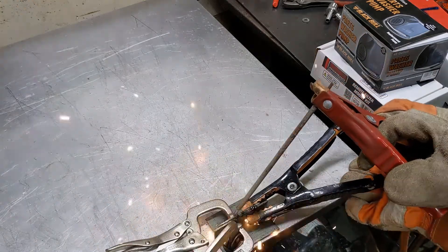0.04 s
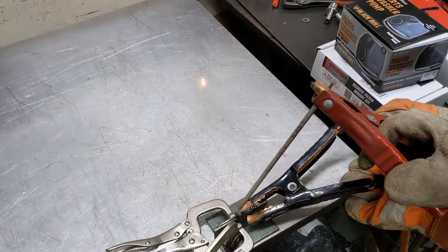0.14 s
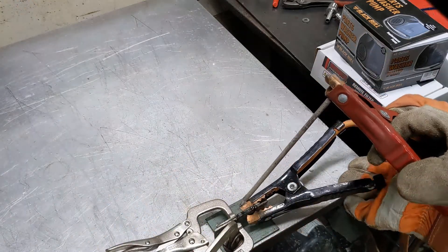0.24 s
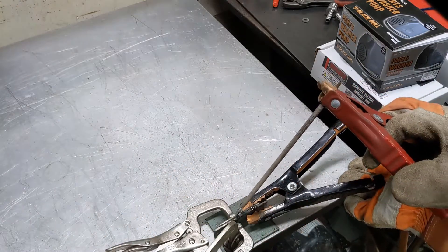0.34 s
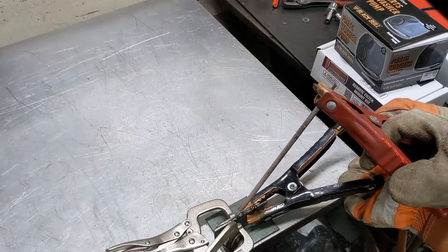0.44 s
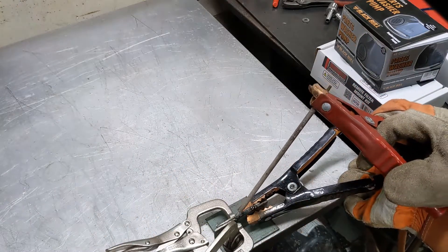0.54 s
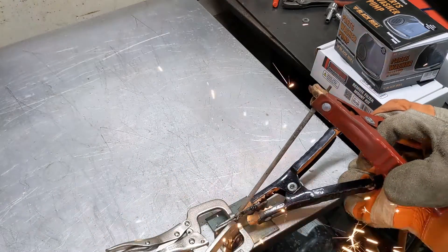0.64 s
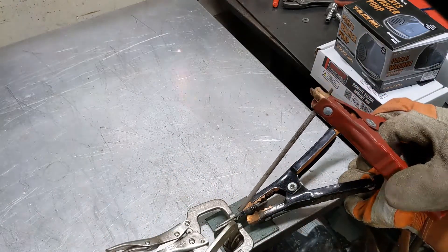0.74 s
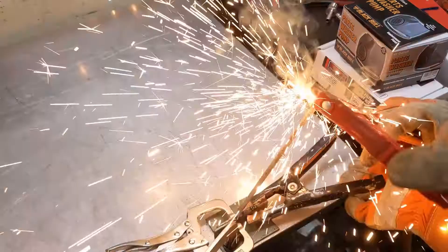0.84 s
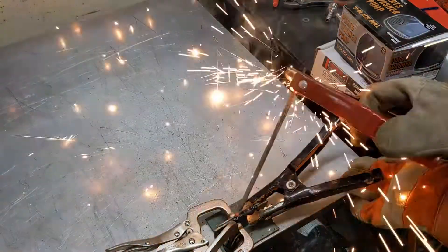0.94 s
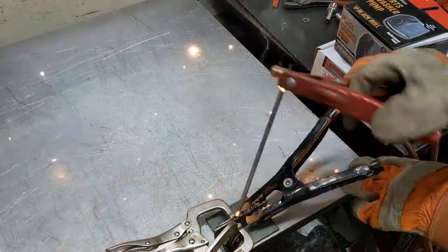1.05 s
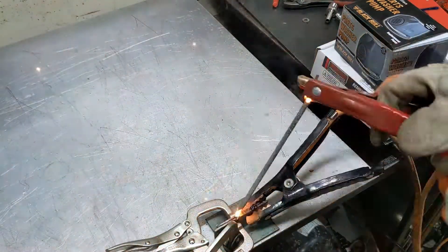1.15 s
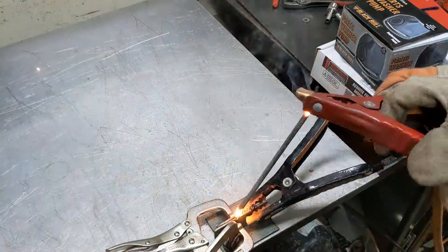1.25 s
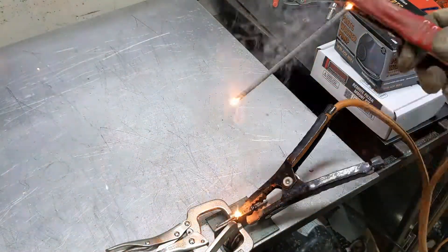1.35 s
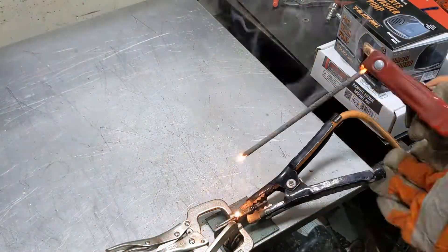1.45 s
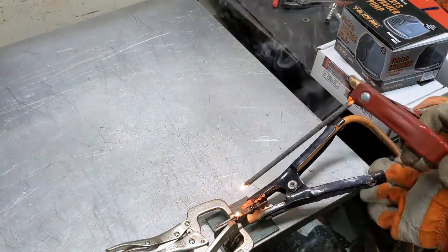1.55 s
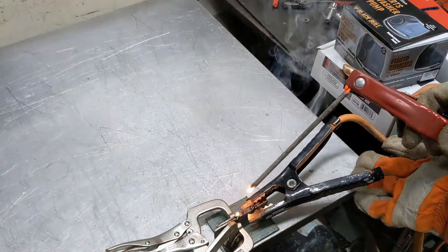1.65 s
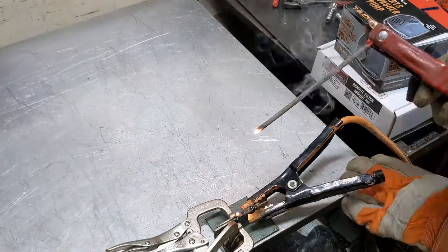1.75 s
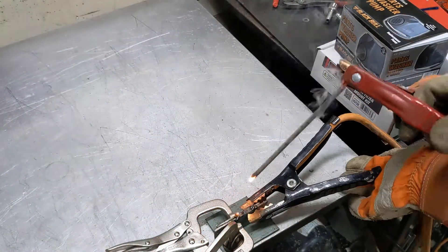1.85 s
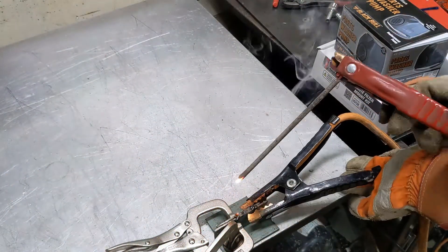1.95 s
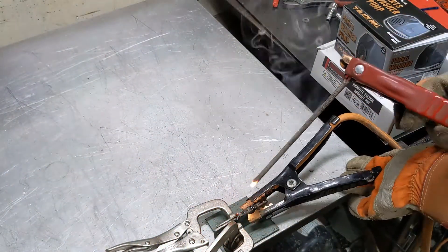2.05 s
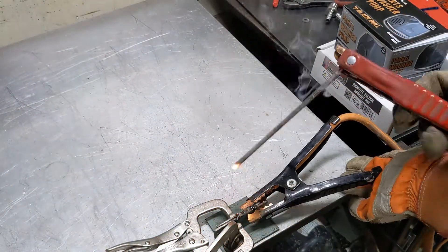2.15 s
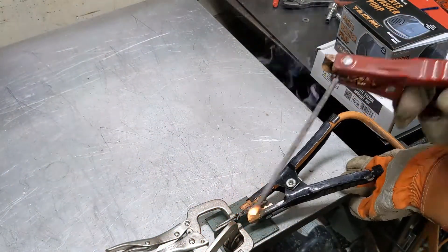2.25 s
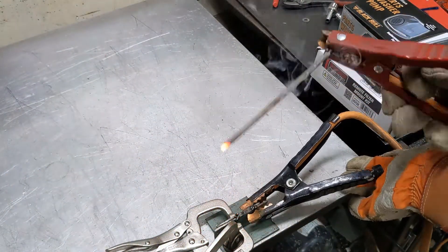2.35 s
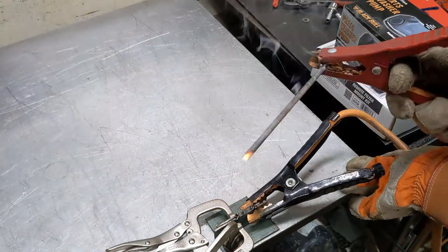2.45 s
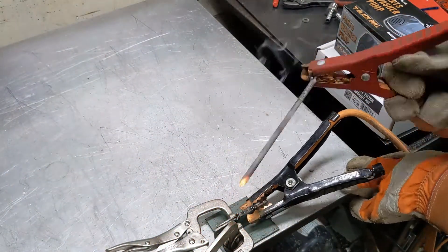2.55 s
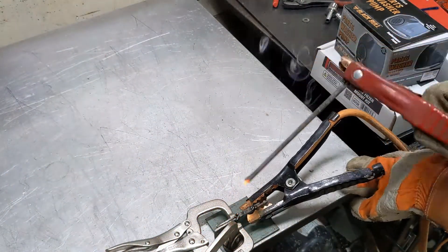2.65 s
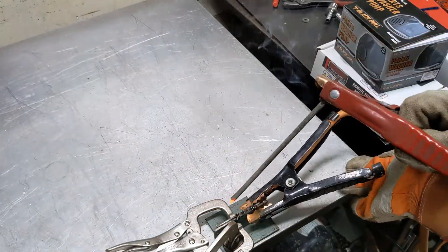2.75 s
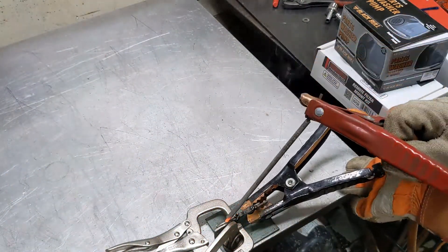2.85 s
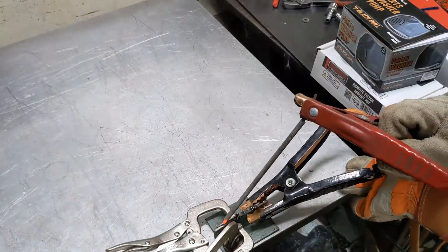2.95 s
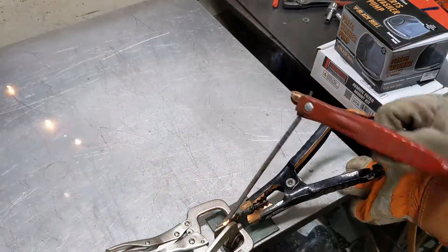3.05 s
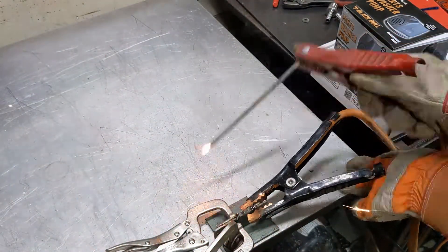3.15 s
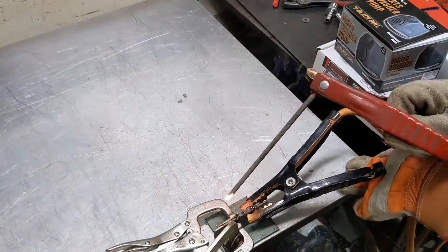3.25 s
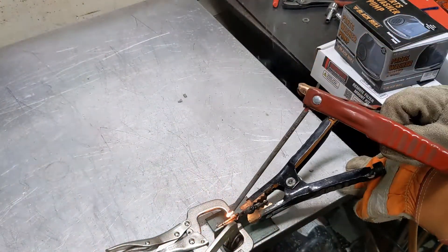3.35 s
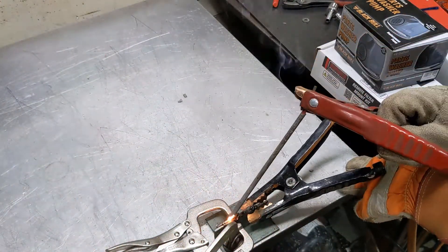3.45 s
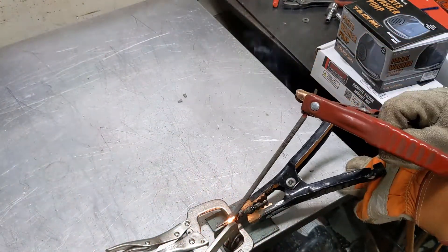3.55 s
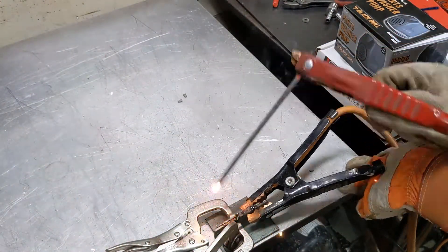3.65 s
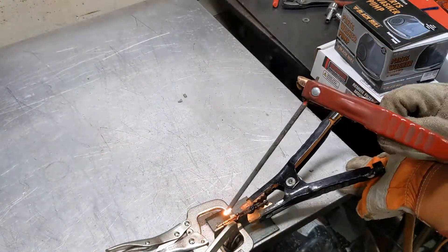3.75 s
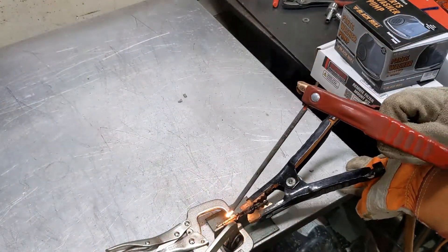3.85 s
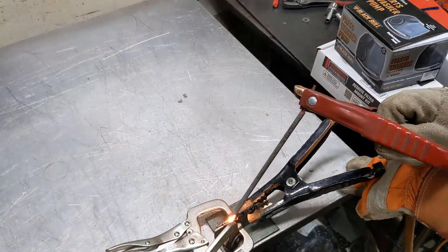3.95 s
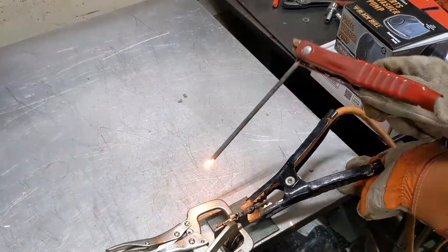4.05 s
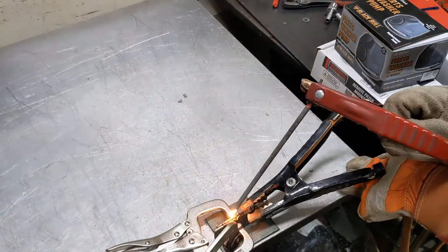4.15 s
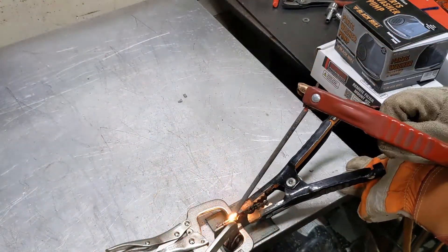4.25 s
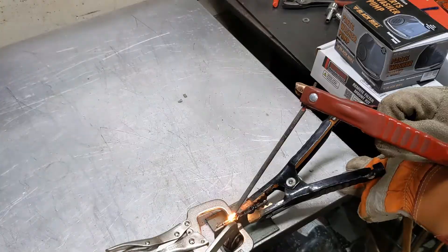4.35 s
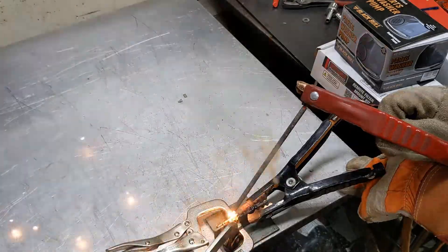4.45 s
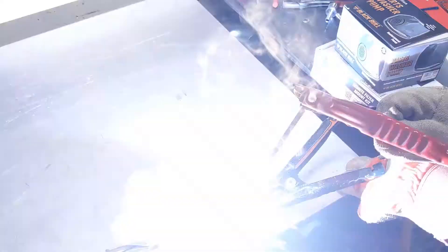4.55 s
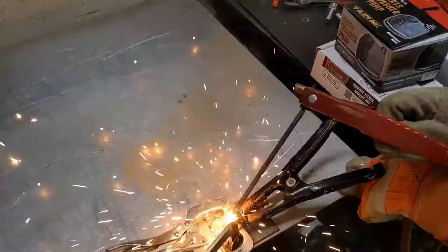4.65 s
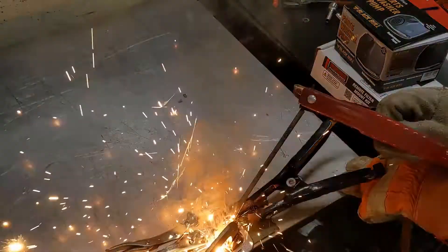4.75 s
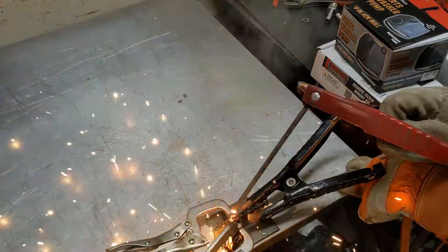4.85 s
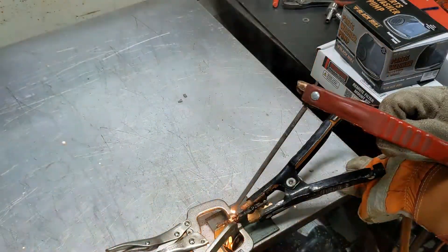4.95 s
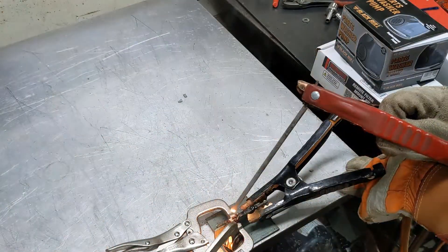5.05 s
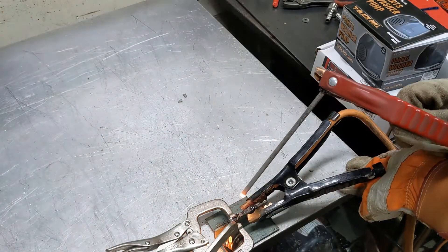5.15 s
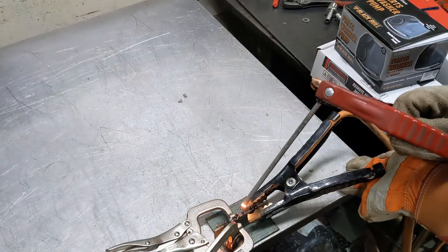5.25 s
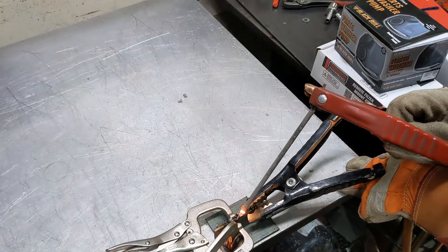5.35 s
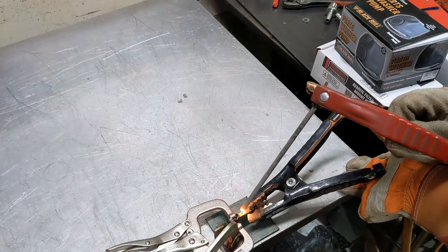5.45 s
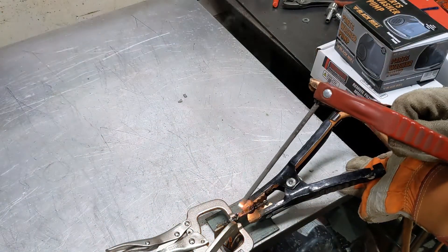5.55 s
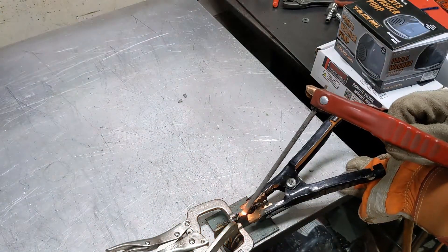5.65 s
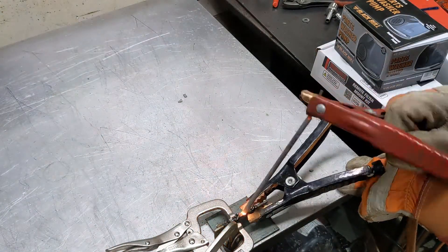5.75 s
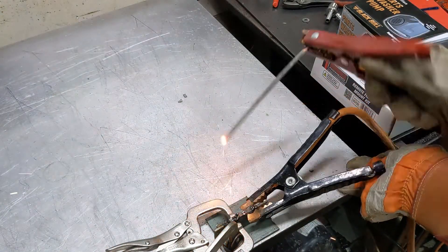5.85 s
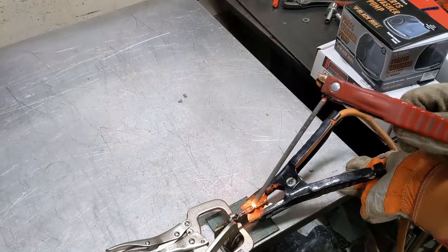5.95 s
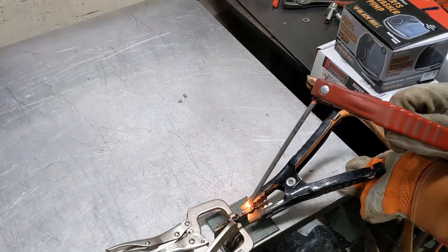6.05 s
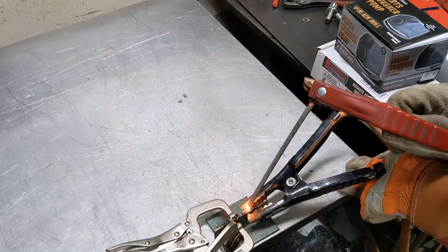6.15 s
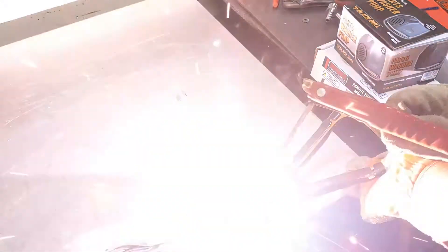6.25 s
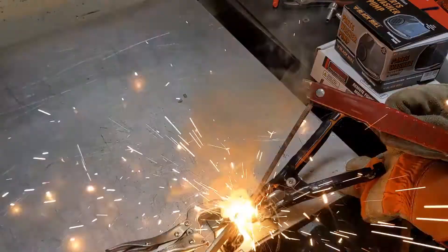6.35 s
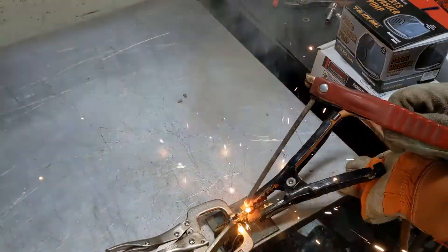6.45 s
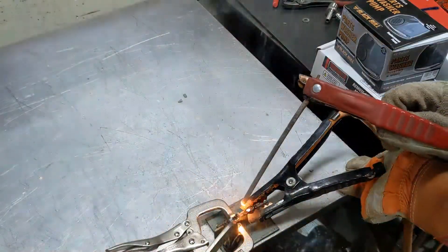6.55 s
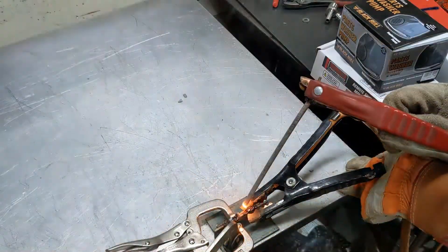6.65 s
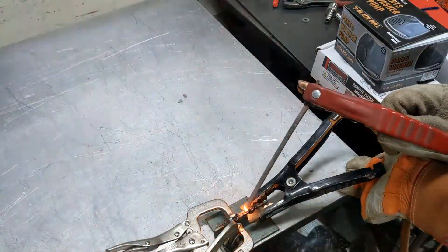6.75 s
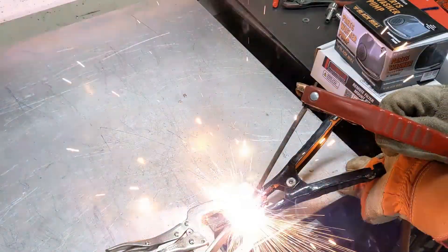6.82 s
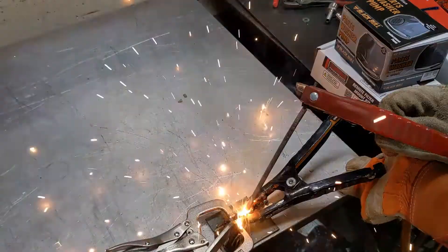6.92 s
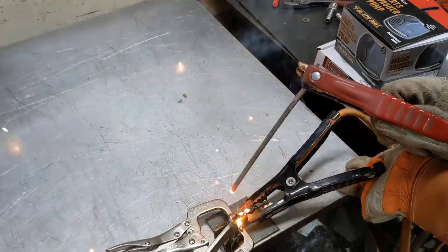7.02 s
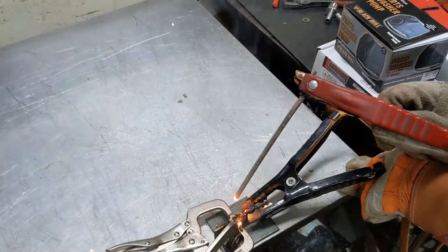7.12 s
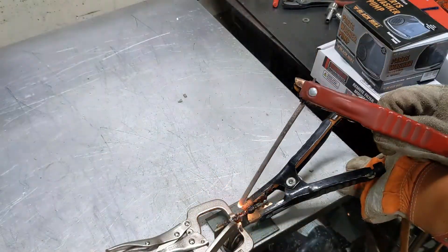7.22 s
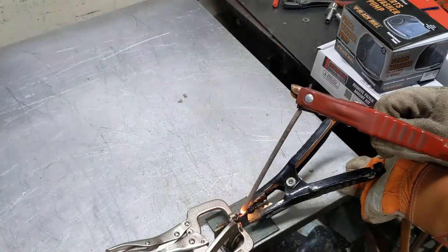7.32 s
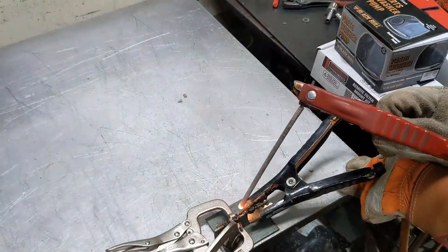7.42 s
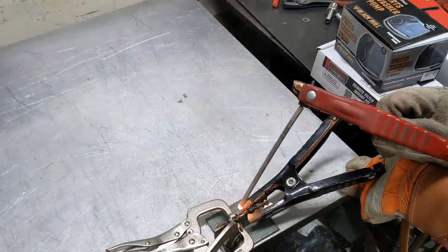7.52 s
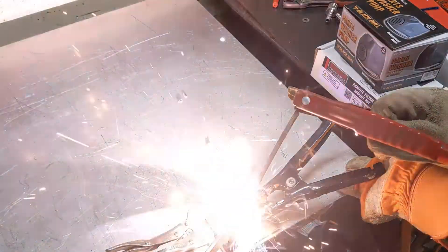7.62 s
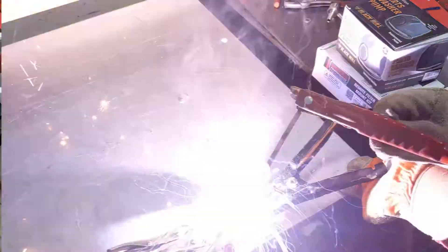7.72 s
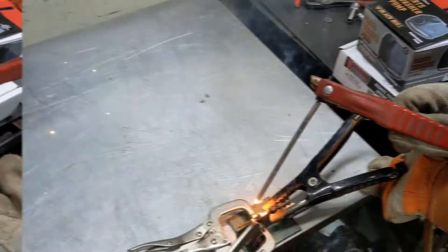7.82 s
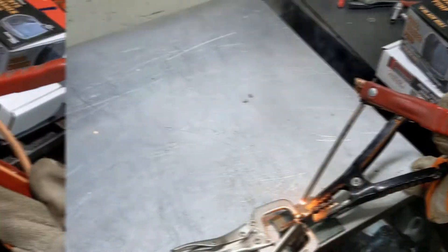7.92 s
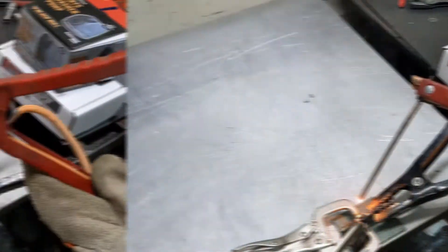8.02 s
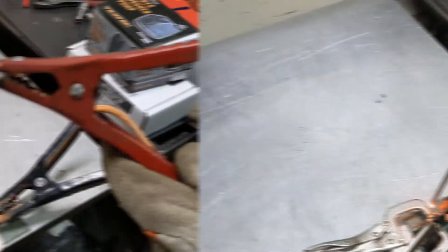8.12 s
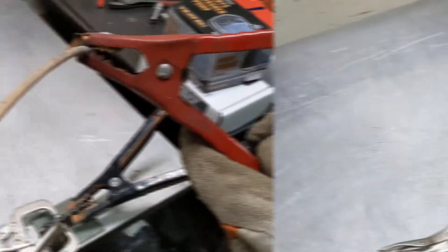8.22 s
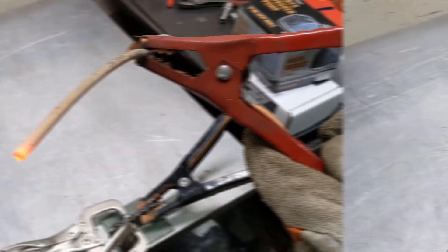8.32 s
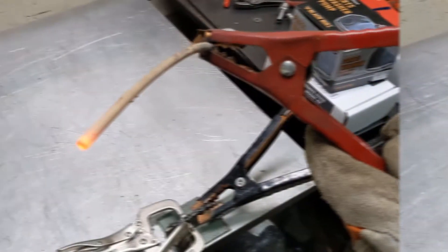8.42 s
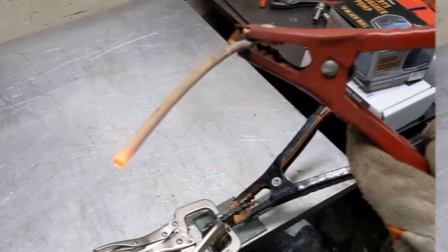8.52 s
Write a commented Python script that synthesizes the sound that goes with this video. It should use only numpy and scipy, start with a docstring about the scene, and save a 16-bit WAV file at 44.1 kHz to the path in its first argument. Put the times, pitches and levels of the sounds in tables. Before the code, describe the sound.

A stick-welding arc keeps catching and dying on clamped steel, heard close in a workshop over a faint steady fan and transformer hum. A quick cluster of pops opens. Snaps near 0.6 seconds lead to a loud sizzling, cracking sputter from 0.8 to 1 second, ending in a light metallic ring. Another snap comes at 1.3, then only faint ticks and hisses. Between 3 and 4 seconds, rod taps make small separate snaps, some ringing slightly. The arc sputters with sharp pops from 4.4 to 4.8, followed by two thin snaps near 5.6 and 5.9. Loud short bursts of crackle, sizzle and thumping pops come at about 6.3, 6.9 and 7.6 to 7.8 seconds, leaving spatter fizzing faintly as it cools. At about 8.2 seconds the hum and fizz give way abruptly to a quiet low rumble.

```python
"""Sharp pops and short sputters of a stick-welding arc that never holds, over a fan's hum.
The rod is scratched and tapped on clamped steel in a workshop: both ring, a light touch only flashes.
When the arc catches, discharges sizzle, hot gas roars, sparks crack, molten bridges burst, and
spatter is left fizzing on the plate. Near the end the welder's fan, its transformer hum and the fizz
give way abruptly to a low rumble."""
import sys
import numpy as np
from scipy import signal
from scipy.fft import rfft, irfft, next_fast_len
from scipy.io import wavfile
from scipy.ndimage import uniform_filter1d

SR = 44100
rng = np.random.default_rng(int(sys.argv[2]) if len(sys.argv) > 2 else 0)


def file_out(sig):
    """Save sig as 16-bit WAV at sys.argv[1]."""
    # one column per channel
    cols = np.atleast_2d(sig).T
    # limit, then scale
    lim = np.clip(cols, -1, 1)
    pcm = np.round(lim * 32767).astype(np.int16)
    wavfile.write(sys.argv[1], SR, pcm)


N = 378378
TIME = np.arange(N) / SR
BURN_SAG_DB_PER_S = 44

# arc catches: start_s, length_s, sizzle_db, roar_re_sizzle_db, left_right_db, spatter_db
BURNS = [(0.025, 0.013, -39.5, -15, 3, -56), (0.8244, 0.056, -21, -12, 1.5, -56),
         (4.4041, 0.014, -23, -10.5, -1.5, -79), (4.5741, 0.061, -28.5, -8.5, 0.5, -52),
         (4.712, 0.037, -32.5, -11, -0.5, -55.5), (4.756, 0.016, -27.5, -6, -1, -53),
         (6.276, 0.028, -37.5, -24, 8, -70), (6.3027, 0.032, -20.5, -9.5, 3, -61),
         (6.35, 0.039, -25.5, -13, -1, -53), (6.824, 0.081, -34.5, -19, 4, -71),
         (6.901, 0.042, -31, -10.5, 0.5, -56.5), (7.586, 0.082, -25.5, -12, 0.5, -75),
         (7.66, 0.077, -39, -27, 4, -58)]
# touches that only flash: start_s, sizzle_db, brightness_db, left_right_db
FLASHES = [(0.032, -20.5, 6, 6), (0.577, -35, 2, 2), (0.6671, -22.5, 5, 1), (0.9291, -24, 2, -2),
           (0.956, -32.5, 4, 9), (0.9801, -24, 6, 12), (1.2963, -22.5, 3, 3), (3.0187, -25.5, 4.5, -1.5),
           (3.176, -29.5, 3, -2.5), (3.2307, -34.5, 6, -4.5), (3.558, -31.5, -28, -1),
           (3.6442, -28.5, 6.5, -0.5), (3.9792, -33, 0, -1), (4.043, -38.5, 7, -1), (4.657, -38, -7, 6),
           (4.68, -22.5, 7, 0.5), (5.6333, -27, 24, 1), (5.8659, -27, 11, -0.5), (6.255, -22.5, 1, -1),
           (7.764, -27, 0, -2)]
# rod and clamp modes: pitch_hz, level_db, t60_s
ROD_MODES = [(483, -3, 0.14), (947, -5, 0.13), (1415, 2.5, 0.05), (1700, -10.5, 0.082), (2455, -18, 0.08),
             (2563, -16.5, 0.15), (2940, -8.5, 0.12), (3660, -12, 0.065), (4670, -12, 0.05)]


def arc(thrown):
    """Dense discharges sizzle and hot gas roars; only longer burns build a deep rumble."""
    # spectra: freq_hz, density_db
    sizzle_spectrum = [(700, -15), (1400, 0), (3000, 0.5), (5500, -0.5), (8500, -2.5), (12000, 1),
                       (16000, -5)]
    roar_spectrum = [(25, 8), (70, -1.5), (125, 14.5), (220, 5), (500, -0.5), (1000, -1.5), (1800, -27.5),
                     (4000, -53.5)]
    flash_s, flash_roar_db, burn_bright_db = 0.0032, -9, 6.5
    surge_db, surge_s = 7, 0.0037
    grains = colour(crackle(per_s=10000, spread_db=2.0), sizzle_spectrum) * from_db(2.73 * drift(500))
    dull = butter(grains, 5430, "low", order=1)
    gas = colour(stereo_noise(common=0.17), roar_spectrum)
    # gas shakes the clamp
    clamp = sum(from_db(db) * resonate(gas, hz, 0.22 * hz) for hz, db, _ in ROD_MODES)
    roar = wind_filter(gas) + from_db(-5) * clamp
    deep = from_db(-2) * butter(gas, 84, "low", order=4)
    # arc surges after each thrown spark
    surges = np.zeros(N)
    surges[[round(s * SR) for s, *_ in thrown]] = from_db(surge_db)
    sputter = 1 + decay(surges, surge_s)
    flares = [(s, flash_s, db, flash_roar_db, bright_db, side_db)
              for s, db, bright_db, side_db in FLASHES]
    flares += [(s, length_s, db, roar_db, burn_bright_db, side_db)
               for s, length_s, db, roar_db, side_db, _ in BURNS]
    out = np.zeros((2, N))
    for start_s, length_s, db, roar_db, bright_db, side_db in flares:
        span, glow = burst(start_s, length_s, rise_s=0.00043, fall_s=0.0021)
        _, heat = burst(start_s, length_s, rise_s=0.00023, fall_s=0.00099)
        treble = from_db(1.63 * (bright_db - 4.5)) * (grains[:, span] - dull[:, span])
        sizzle = rms_one(dull[:, span] + treble)
        plume = np.clip((length_s - .005) / 0.02, 0, 1)
        hot_gas = from_db(roar_db) * heat * (roar[:, span] + plume * deep[:, span])
        unsteady = sputter[span] / np.sqrt(np.average(sputter[span] ** 2, weights=glow))
        strength = from_db(db - BURN_SAG_DB_PER_S * (TIME[span] - start_s)) * unsteady
        out[:, span] += strength * pan(side_db) * (glow * sizzle + hot_gas)
    return out


def pops():
    """Molten bridges burst: a crack, and a collapsing pressure step that thumps in the wind filter."""
    # start_s, thump_db, crack_db, left_right_db
    bridge_bursts = [(0.032, -19, -15, -27), (0.038, -2, -16, -15), (0.0436, -1, -14, 12),
                     (0.205, -18.5, -39, 16), (0.3256, -22, -38, -15), (0.8782, -1.5, -5, -3.5),
                     (0.981, -7.5, -12, -38), (4.4171, -5, -7, 21), (4.6845, -7, -8.5, 14),
                     (4.9727, -22, -36, 16), (5.0689, -21, -33, -11), (6.256, -1.5, -22, -32),
                     (6.2618, -4.5, -8, -37), (6.3557, -8.5, -3.5, 11), (6.3889, -16.5, -11, 5),
                     (6.4946, -20, -30, 13), (6.838, 0.5, -4.5, 2.5), (6.8645, -12, -12, 18),
                     (6.8841, -16.5, -22, -14), (6.9085, -15, -5, 33), (6.921, -35, -9.5, 41),
                     (6.9406, -16.5, -15, 13), (7.5874, 0.5, -9, 20), (7.709, -1.5, -8, -7.5),
                     (7.912, -23, -34.5, 12)]
    steps = impulses([(s, thump_db, side_db) for s, thump_db, _, side_db in bridge_bursts])
    cracks = impulses([(s, crack_db, side_db / 2) for s, _, crack_db, side_db in bridge_bursts])
    widened = steps - from_db(-12.5) * steps[::-1]
    blast = butter(decay(widened, tau_s=0.00025), 6400, "low", order=1)
    return from_db(0.5) * (wind_filter(blast) + needles(cracks))


def sparks(start_s, length_s, sizzle_db, per_s=120, count=24):
    """Sparks thrown by one burn, the first as it catches: start_s, level_db, left_right_db."""
    gaps_s = rng.uniform(.5, 1.5, count) / per_s
    ages_s = np.cumsum(gaps_s) - gaps_s[0]
    size, side = rng.standard_normal((2, count))
    level_db = sizzle_db + 5.5 + 2.5 * size - BURN_SAG_DB_PER_S * ages_s
    side_db = 11 + 10 * side
    return np.transpose([start_s + ages_s, level_db, side_db])[ages_s < length_s]


def snaps(thrown):
    """Sparks crack without a thump: a few loud ones, those from burns, one per flash."""
    # start_s, level_db, left_right_db
    loud_sparks = [(0.6682, -8.5, 1), (0.8318, 3, 17), (0.8416, -1.5, 16), (0.8832, -12, 10),
                   (0.9294, -6.5, 12), (4.4078, -12, -37), (4.7693, -4, 31), (6.3097, -14, 25),
                   (6.322, -4.5, 19), (7.5976, -10, 29.5), (7.608, -5.5, 20), (7.6333, 2, 19)]
    flash_sparks = [(s, db + 3 + 0.37 * bright_db, side_db) for s, db, bright_db, side_db in FLASHES]
    return needles(impulses(loud_sparks + thrown + flash_sparks))


def needles(clicks):
    """Each crack is a bright needle of pressure with a brief frying wake."""
    t = TIME[:200]
    wake = rng.standard_normal((2, len(t))) * np.exp(-t / .0003)
    needle = clicks + from_db(-23) * signal.fftconvolve(clicks, wake, axes=1)[:, :N]
    sheen = from_db(-7) * resonate(needle, 9000, 5000)
    return from_db(5.5) * (butter(needle, 1500, "high", order=1) + sheen)


def rod_ring():
    """Knocks and touches ring rod and clamp, most in the modes the contact point favours."""
    # rod on steel: start_s, level_db, favoured_hz
    knocks = [(.578, -36.5, 3100), (.668, -39, 3000), (1.005, -32, 2550), (1.006, -32, 770),
              (1.014, -37, 2570), (1.311, -43, 1410), (3.02, -37.5, 1580), (3.559, -37, 1820),
              (3.645, -53, 500), (3.979, -35.5, 1740)]
    touch_re_flash_db, touch_hz, rolloff_db_per_octave = -14, 2270, 11.4
    touches = [(s, db + touch_re_flash_db, touch_hz) for s, db, *_ in FLASHES]
    t, out = TIME[:SR // 4], np.zeros((2, N))
    for start_s, db, favoured_hz in knocks + touches:
        at = round(start_s * SR)
        for hz, mode_db, t60_s in ROD_MODES:
            loss_db = rolloff_db_per_octave * abs(np.log2(hz / favoured_hz))
            strength = from_db(db + mode_db - loss_db + 1.6 * rng.standard_normal((2, 1)))
            out[:, at:at + len(t)] += strength * from_db(-60 * t / t60_s) * np.sin(2 * np.pi * hz * t)
    return out


def hisses():
    """Brief hisses and two faint midrange rasps, each around one pitch."""
    # start_s, length_s, level_db, centre_hz
    noise_bursts = [(0.064, 0.018, -48, 8900), (1, 0.017, -43, 7150), (1.194, 0.015, -44.5, 5200),
                    (1.256, 0.01, -50, 7800), (1.949, 0.0032, -47.5, 11600), (2.157, 0.003, -46, 11500),
                    (2.188, 0.036, -59, 5150), (2.419, 0.0053, -44, 4130), (2.651, 0.0015, -37.5, 4340),
                    (2.678, 0.0029, -49, 7260), (3.077, 0.2, -61, 1890), (3.254, 0.0087, -50.5, 8000),
                    (5.412, 0.0105, -50, 7000), (5.875, 0.055, -54, 1700)]
    out, grit = np.zeros((2, N)), stereo_noise(common=0.35)
    for start_s, length_s, db, hz in noise_bursts + holder_ticks():
        span, envelope = burst(start_s, length_s, rise_s=0.0019, fall_s=0.0012)
        out[:, span] += from_db(db) * envelope * noise_band(grit[:, span], hz, 1.3 * hz)
    return out


def holder_ticks(count=12, from_s=1.25, to_s=2.8, length_s=0.0047, mean_db=-56, median_hz=6900):
    """The lifted rod shifts in its holder: start_s, length_s, level_db, centre_hz."""
    starts_s = np.interp(np.arange(count) + rng.random(count), [0, count], [from_s, to_s])
    levels_db = mean_db + 3 * rng.standard_normal(count)
    centres_hz = np.minimum(median_hz * 2 ** (0.5 * rng.standard_normal(count)), SR / 4)
    return [(s, length_s, db, hz) for s, db, hz in zip(starts_s, levels_db, centres_hz)]


def spatter():
    """Droplets land as each burn ends, then fizz and tick as they cool, over a faint hiss."""
    # faint steady fizz, with soft handling rustle between attempts: time_s, level_db
    faint_hiss = [(0, -67.5), (0.9, -71), (1.25, -55.5), (1.5, -65.5), (2.3, -63.5), (2.9, -67.5),
                  (5.5, -68), (5.9, -62.5), (6.2, -69), (8.2, -68.5)]
    # freq_hz, density_db
    fizz_spectrum = [(300, -8), (700, -13.5), (1500, 5), (3000, 5.5), (6000, 3), (10000, 2.5),
                     (16000, -0.5)]
    cool_db_per_s, landing_s, strays_per_s = 38, 0.027, 16
    landed = np.zeros(N)
    for start_s, length_s, *_, spatter_db in BURNS:
        landed[round((start_s + length_s) * SR)] = from_db(spatter_db) ** 2
    cooling = signal.lfilter([1], [1, -from_db(-cool_db_per_s / SR) ** 2], landed)
    droplet_power = uniform_filter1d(cooling, int(landing_s * SR) + 1)
    hiss_power = from_db(np.interp(TIME, *np.transpose(faint_hiss))) ** 2
    frying = stereo_noise(common=0.051) + from_db(-4) * crackle(per_s=2200, spread_db=-3.5)
    strays = needles((rng.random(N) < strays_per_s / SR) * rng.uniform(-1, 1, (2, N)))
    fizz = from_db(2.0 + 2.2 * drift(40)) * colour(frying, fizz_spectrum)
    return np.sqrt(droplet_power + hiss_power) * (fizz + from_db(23) * strays)


def workshop(x, near_db, near_t60_s, far_db, far_t60_s):
    """Table and clutter scatter at once; the walls answer later and duller."""
    t = TIME[:SR]
    near = rng.standard_normal((2, SR)) * from_db(-60 * t / near_t60_s) * (t > .0008)
    far = butter(rng.standard_normal((2, SR)), 9800, "low", order=1)
    far *= from_db(-60 * t / far_t60_s) * (t > .01)
    echoes = (from_db(near_db) * rms_one(near) + from_db(far_db) * rms_one(far)) / np.sqrt(SR)
    return signal.fftconvolve(x, echoes, axes=1)[:, :N]


def welder():
    """Fan draught excites the case; blade tones and transformer hum waver slightly."""
    # freq_hz, density_db
    fan_spectrum = [(25, -25), (90, -20), (125, -24.5), (190, -2.5), (300, 3.5), (400, 3.5), (600, 2),
                    (800, -3), (1200, -3.5), (2000, -10.5), (4000, -20.5), (9500, -34.5), (16000, -37)]
    # centre_hz, stage_width_hz, level_db
    case_modes = [(146.4, 6.1, -78), (220, 32, -63), (480, 40, -68), (669, 140, -67.5), (2402, 23, -79),
                  (9600, 830, -77.5)]
    # pitch_hz, level_db
    hum_lines = [(220.7, -65.5), (436.0, -65.5), (479.1, -58), (511.4, -65.5), (656.8, -63.5),
                 (1168, -76.5)]
    out = from_db(-57) * colour(room_noise(split_hz=2400), fan_spectrum)
    for hz, width_hz, db in case_modes:
        out += from_db(db) * noise_band(room_noise(split_hz=2260), hz, width_hz)
    for hz, db in hum_lines:
        phase = 2 * np.pi * hz * TIME + 0.32 * drift(3.6) + 0.1 * np.array([drift(7), drift(4.7)])
        out += np.sqrt(2) * from_db(db - 2.0 + 0.4 * drift(11)) * np.sin(phase)
    return out


def background(switch_s=8.19, fade_s=0.0086):
    """Welder and spatter give way abruptly to a low rumble."""
    # freq_hz, density_db
    rumble_spectrum = [(25, -20), (55, -5), (85, -15.5), (120, 3.5), (190, -12), (350, -16.5), (600, -25),
                       (2000, -32), (6000, -39), (16000, -52)]
    running = np.clip((switch_s - TIME) / fade_s + .5, 0, 1)
    rumble = from_db(-52.5) * colour(room_noise(split_hz=530), rumble_spectrum)
    return running * (welder() + spatter()) + (1 - running) * rumble


def room_noise(split_hz):
    """Diffuse noise at two close microphones: long waves alike, short ones different."""
    mid, side = rng.standard_normal((2, N))
    side = butter(side, split_hz, "high") + from_db(-15) * rng.standard_normal(N)
    return mid + side * np.array([[1], [-1]])


def wind_filter(x):
    """The microphone's steep bass cut rings near its corner and leaks a little deep bass."""
    return butter(x, 208, "high", order=5) + from_db(-20) * butter(x, 130, "low", order=2)


def crackle(per_s, spread_db):
    """Tiny discharges of random time, size and side; unit power."""
    sizes = from_db(spread_db * np.minimum(rng.exponential(1, N), 4.5))
    return rms_one((rng.random(N) < per_s / SR) * sizes * rng.standard_normal((2, N)))


def stereo_noise(common):
    """White noise with a share of its power common to both sides."""
    return np.sqrt(common) * rng.standard_normal(N) + np.sqrt(1 - common) * rng.standard_normal((2, N))


def drift(per_s):
    """Random wander of unit power."""
    knots = rng.standard_normal(int(N / SR * per_s) + 2)
    return rms_one(np.interp(TIME * per_s, np.arange(len(knots)), knots))


def burst(start_s, length_s, rise_s, fall_s):
    """Sample span and its rise-hold-fall envelope."""
    span = slice(int(start_s * SR), int((start_s + length_s + 0.018) * SR))
    t = TIME[span] - TIME[span][0]
    return span, (1 - np.exp(-t / rise_s)) * np.exp(-np.maximum(t - length_s, 0) / fall_s)


def impulses(rows):
    """One stereo click per row."""
    out = np.zeros((2, N))
    for start_s, db, side_db in rows:
        out[:, [round(start_s * SR)]] += from_db(db) * pan(side_db)
    return out


def decay(x, tau_s):
    """Exponential tail on each impulse."""
    return signal.lfilter([1], [1, -np.exp(-1 / (tau_s * SR))], x + 1e-18)


def colour(x, spectrum):
    """Impose a spectrum; unit power."""
    hz, db = np.transpose(spectrum)
    size = next_fast_len(N)
    bins_hz = np.maximum(np.fft.rfftfreq(size, 1 / SR), 1)
    gain = from_db(np.interp(np.log(bins_hz), np.log(hz), db))
    return rms_one(irfft(rfft(x, size) * gain, size)[:, :N])


def noise_band(noise, hz, stage_width_hz):
    """Two equal resonances in series; unit power."""
    return rms_one(resonate(resonate(noise, hz, stage_width_hz), hz, stage_width_hz))


def resonate(x, hz, width_hz):
    """One resonance, peak gain 1."""
    r = np.exp(-np.pi * width_hz / SR)
    feedback = [1, -2 * r * np.cos(2 * np.pi * hz / SR), r * r]
    return signal.lfilter(np.array([1, 0, -1]) * (1 - r * r) / 2, feedback, x + 1e-18)


def butter(x, hz, kind, order=2):
    """Causal Butterworth filter."""
    return signal.sosfilt(signal.butter(order, hz, kind, fs=SR, output="sos"), x + 1e-18)


def pan(db):
    """Left and right gains of mean power 1."""
    return rms_one(from_db([[db / 2], [-db / 2]]))


def rms_one(x):
    """Scale to unit power."""
    return x / np.sqrt(np.mean(x ** 2) + 1e-20)


def from_db(db):
    """Decibels to gain."""
    return 10 ** (np.asarray(db) / 20)


def scene():
    """Sizzle fills the room; pops and snaps stay close and nearly dry."""
    thrown = [spark for start_s, length_s, db, *_ in BURNS for spark in sparks(start_s, length_s, db)]
    sizzle = arc(thrown) + hisses()
    cracks = pops() + snaps(thrown)
    send = sizzle + from_db(-26) * cracks
    room = workshop(send, near_db=-6, near_t60_s=0.075, far_db=-25.5, far_t60_s=0.91)
    return sizzle + cracks + rod_ring() + room + background()


def record(dry):
    """Overload rounds the tallest peaks; a steep low-pass cuts the top."""
    ceiling, cutoff_hz = 1.15, 16000
    rounded = ceiling * np.tanh(dry / ceiling)
    return signal.sosfiltfilt(signal.ellip(10, .05, 60, cutoff_hz, fs=SR, output="sos"), rounded)


dry = scene()
out = record(dry)
file_out(out)
```